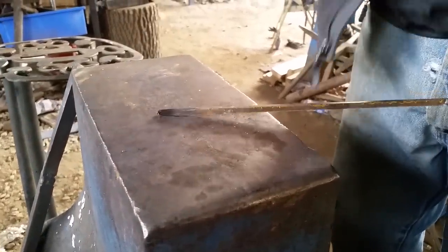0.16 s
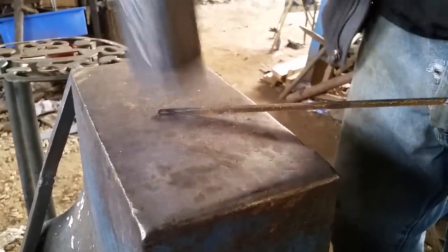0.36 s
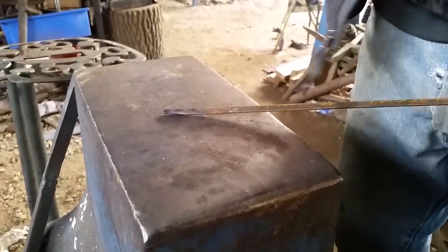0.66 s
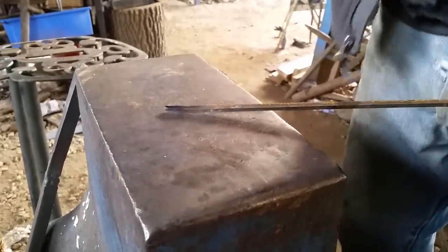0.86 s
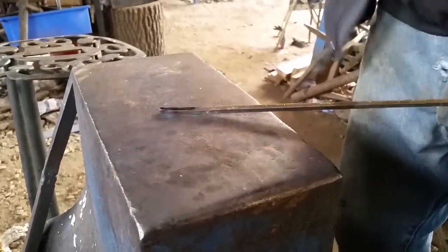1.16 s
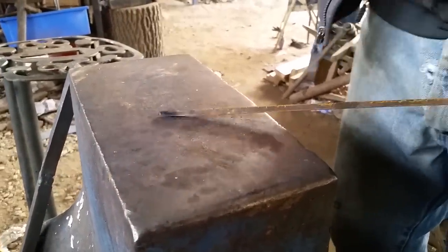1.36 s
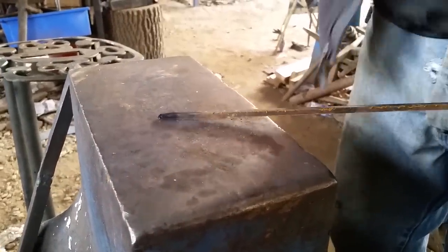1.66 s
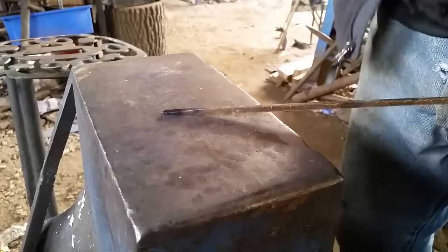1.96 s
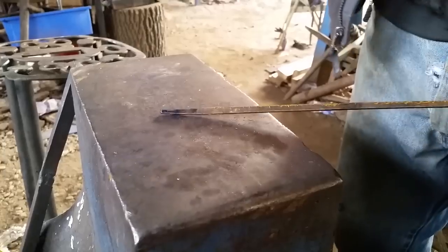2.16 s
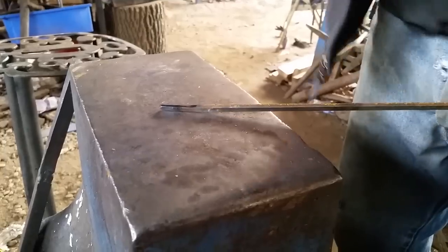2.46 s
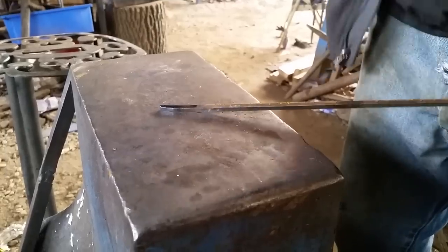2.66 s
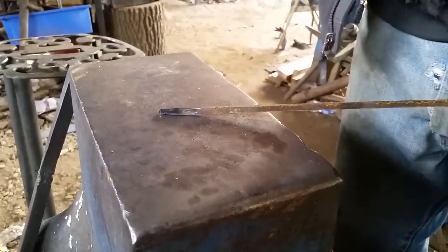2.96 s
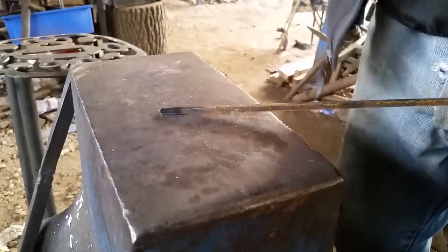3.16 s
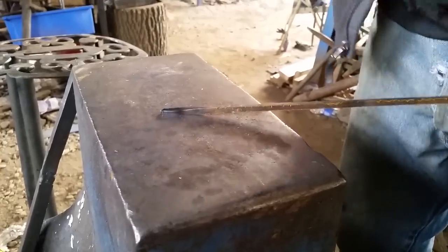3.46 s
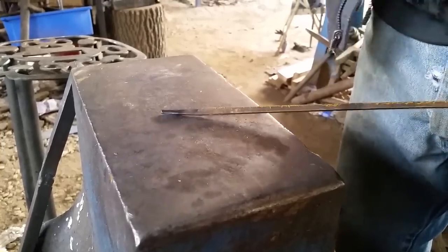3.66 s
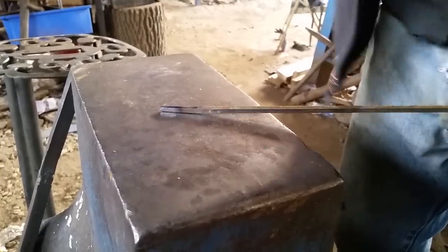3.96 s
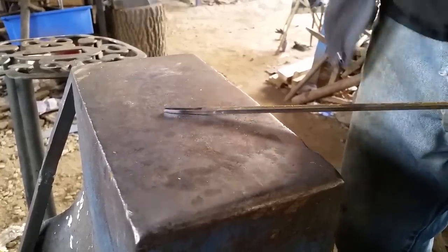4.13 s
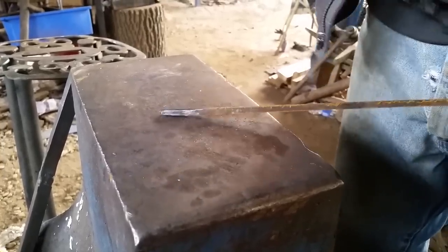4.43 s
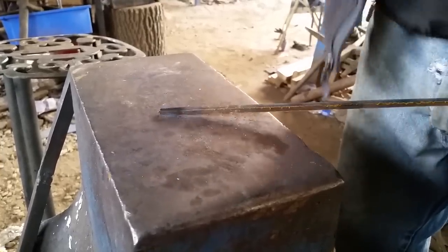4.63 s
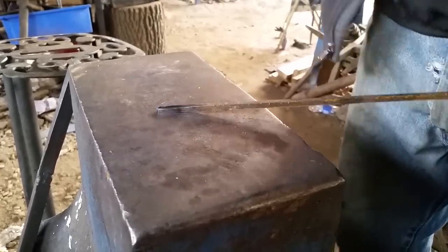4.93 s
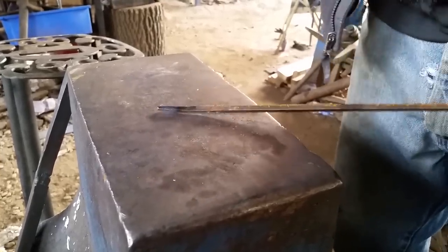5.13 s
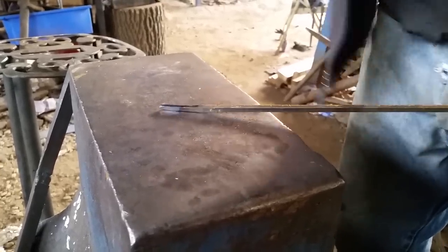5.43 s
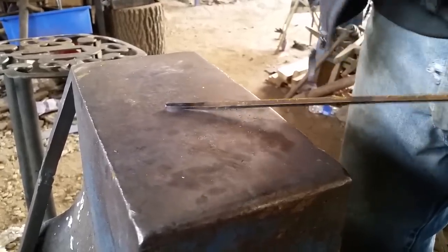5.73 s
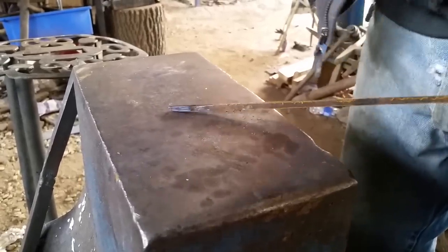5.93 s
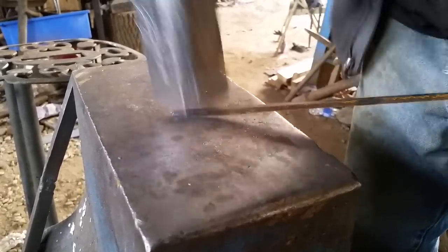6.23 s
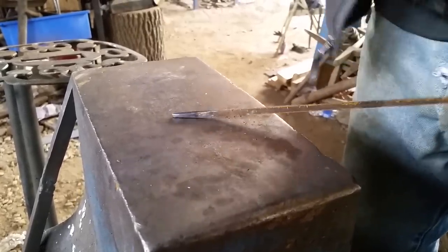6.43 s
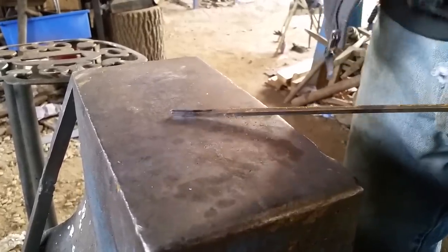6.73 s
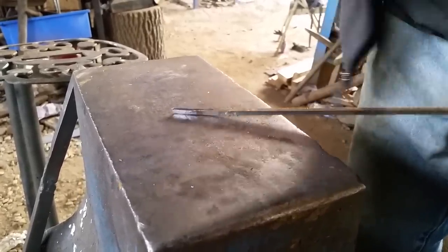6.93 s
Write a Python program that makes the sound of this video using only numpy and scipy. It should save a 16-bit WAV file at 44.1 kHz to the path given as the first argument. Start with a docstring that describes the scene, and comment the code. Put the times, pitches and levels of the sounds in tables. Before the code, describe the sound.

A hand hammer strikes a thin steel rod on an anvil, close to the microphone in an open shed. The work is already under way, and the first full blow lands at about 0.5 seconds. Others follow evenly at 1.2, 1.9, 2.7, 3.4, 4.2, 4.9, 5.6 and 6.4 seconds. Each is a sharp crack with a solid thump from the anvil's stand and a very high, fizzy ping that fades quickly. The blow at 1.9 seconds rings most, while those at 4.2 and 5.6 crack hardest. Between hits the rod makes barely audible scrapes and ticks on the anvil's face, with one clearer light tick at about 6.5 seconds. The shed answers each strike with a short reverberation and a soft, low boom. A faint outdoor rumble continues underneath throughout.

```python
"""Hammer and anvil in an open shed

A hand hammer flattens the tip of a thin steel rod with even blows, already under way, close by.
Each impact cracks, thumps the anvil's stand and excites the steel's modes, which ping and sizzle.
Between blows the rod slides and ticks on the face. The shed returns a few echoes, a short
reverberation and a low boom, over a faint outdoor rumble."""
import sys
import numpy as np
from scipy import signal
from scipy.fft import rfft, irfft, next_fast_len
from scipy.io import wavfile
from scipy.ndimage import map_coordinates

SR = 44100
rng = np.random.default_rng(int(sys.argv[2]) if len(sys.argv) > 2 else 0)


def digitize_waveform(pressure):
    """Quantize a signal to 16-bit integers and store it at the path in sys.argv[1].

    Rows of a 2-D input are taken as channels; values are limited to [-1, 1].
    """
    field = np.atleast_2d(pressure).T
    bounded = np.clip(field, -1, 1)
    quanta = np.round(bounded * 32767).astype(np.int16)
    wavfile.write(sys.argv[1], SR, quanta)


N = 312669
T = np.arange(SR) / SR  # one second from a sound's onset

# Levels within a table are relative; each source sets its own overall gain.
# background noise spectra: frequency_hz, density_db
RUMBLE_SPECTRUM = [(20, -14), (40, -6.5), (70, 0.5), (120, -2), (200, -5), (300, -23.5), (500, -30),
                   (1000, -67.5)]
RUSH_SPECTRUM = [(150, -2.5), (350, 6), (800, -5), (1500, -15.5), (2200, -28), (3200, -41), (8000, -55)]
HISS_SPECTRUM = [(1000, -2), (8000, -2.5), (11500, -0.5), (15000, -3)]
# likeness of left and right in a diffuse field: frequency_hz, correlation
COHERENCE = [(50, 0.93), (300, .82), (700, .45), (1500, 0.058), (6000, 0.048)]
# hammer blows: start_s, crack_db, ring_db, ping_decay_factor, sizzle_db
BLOWS = [(-0.31, -26.5, -44, .9, -30), (0.4495, -32.5, -42.5, 0.86, -34.5), (1.1956, -21, -41, 1, -33),
         (1.942, -26.5, -36.5, 0.89, -35), (2.6909, -19, -39, 0.93, -35.5), (3.431, -22.5, -39.5, 0.9, -33),
         (4.158, -17, -44, 0.56, -36), (4.9063, -23, -53, 0.82, -36.5), (5.63, -17.5, -42, 0.89, -40.5),
         (6.3525, -22, -48, 0.93, -39.5)]
# the anvil's main note: pitch_hz, level_db, base_t60_s
PING_MODES = [(6951, 0, .23), (6751, -23, .23), (6990, -17, .19)]
# other modes of the steel: pitch_hz, level_db, t60_s
SIDE_MODES = [(6197, 2.5, 0.23), (6160, -5, .19), (6095, -11, .15), (7570, -13, .16), (8075, -16, 0.11),
              (8620, -18, 0.1)]  # either side of the main note
LOW_MODES = [(3962, -3, .23), (4060, -7, .22), (4597, 3, .2), (5400, -12, .17), (5785, -6, .18)]
HIGH_MODES = [(10480, -5, .17), (11510, -3, .18), (11570, -1, .18), (11650, 0, .18), (12630, -5, .16),
              (12790, -4, .16), (13440, -5, .16), (13940, -7, .16)]
TOP_MODES = [(12950, -4, .17), (12988, 0, .18), (13020, -3, .18), (13080, -6, .16)]  # a close cluster that beats
# crowded steel modes in each channel: frequency_hz, density_db
SIZZLE_LEFT = [(2000, -40.5), (4000, -23), (5200, -28), (6700, -17.5), (8400, -41), (9800, -36),
               (10600, -18.5), (12200, -24), (13000, -10), (13500, -13.5), (14400, -11.5), (15000, -29.5)]
SIZZLE_RIGHT = [(2000, -44.5), (4000, -22), (5200, -36.5), (6700, -16), (8500, -35.5), (9400, -12.5),
                (10000, -12.5), (10500, -0.5), (11100, -4), (11600, 4), (12200, -5), (12950, -1),
                (14400, -9), (15000, -34)]
# the shed's reverberation time: frequency_hz, t60_s
SHED_DECAY = [(40, 0.52), (80, 0.6), (150, 0.5), (350, 0.6), (1000, 0.49), (2500, 0.41), (6000, 0.51)]
# spectra of the shed's reverberation: frequency_hz, density_db
LOW_TAIL = [(20, -12.5), (45, -8), (75, -5), (100, -8.5), (140, 8.5), (240, -6.5), (380, 0.5), (470, -3.5),
            (600, -29), (1200, -64.5)]
MID_TAIL = [(250, -28), (550, 0.5), (850, 2), (1150, 0), (2000, -10), (3000, -17), (4200, -32),
            (5200, -37.5), (8000, -56)]
BOOM_SPECTRUM = [(20, -24.5), (50, 5), (74, 8), (98, 0.5), (125, -7.5), (220, -8.5), (400, -25), (900, -66)]
# standing waves in the shed: pitch_hz, level_db, t60_s
SHED_MODES = [(73, -5, 2.0), (124, -2, .65), (148, -3, .42), (174, -2, .42), (200, 1, .4), (237, 2, .42),
              (271, 3, .38), (316, 2, .4), (358, 3, .42), (394, 1, .42), (617, -15, .45), (848, -16, .45),
              (1049, -17, .45)]
# the rod slides on the face: start_s, length_s, level_db
ROD_SLIDES = [(0, 0.15, -85), (1.42, 0.24, -86), (4.347, 0.42, -87)]
# modes of the anvil on its stand: pitch_hz, level_db, t60_s
STAND_MODES = [(58, -12.5, 0.05), (160.7, -3.5, .018), (230, -4, 0.026), (352, -2.5, 0.024)]
# the shed's early reflections: delay_s, relative_gain
ECHOES = [(0.014, .22), (0.0203, -0.23), (0.0224, 0.28), (.0264, -.5), (.033, 0.22)]
# the rod taps the face: start_s, level_db
ROD_TICKS = [(3.3972, -71), (3.6897, -66), (4.582, -67.5), (5.172, -67), (6.524, -47.5)]

RUMBLE_DB, HISS_DB = -57.5, -89.5
RUSH_FAINT_DB, RUSH_FULL_DB, RUSH_SWELL_S = -78.5, -66.5, 5.6
USUAL_CRACK_DB, USUAL_RING_DB, USUAL_SIZZLE_DB = -22.5, -43, -36  # an ordinary blow
THUMP_DB, CLANK_DB, SIDE_DB, LOW_DB = -11.5, -37, -53.5, -60.5  # gains in an ordinary blow
# a blow that lands square cracks harder, and these grow with it, in dB per dB of crack
THUMP_GROWS, CLANK_GROWS, LOW_GROWS, TOP_GROWS = 0.053, 0.14, 0.49, 0.93
SIDE_FOLLOWS, LOW_FOLLOWS = 0.56, 0.7  # dB per dB of ring
CLANK_BRIGHTENS = 0.55  # dB of treble per dB of sizzle
BAND_LIMIT_HZ = 15865


def amp(db):
    """Amplitude ratio of a level in decibels."""
    return 10 ** (np.asarray(db) / 20)


def unit(x):
    """Normalisation to rms 1."""
    return x / np.sqrt(np.mean(x ** 2) + 1e-20)


def along(points, hz):
    """Interpolation on a logarithmic frequency axis."""
    knots_hz, values = np.transpose(points)
    return np.interp(np.log(hz + 1), np.log(knots_hz + 1), values)


def fade(t60, t=T):
    """Exponential decay, 60 dB in t60 seconds."""
    return np.exp(-np.log(1000) * t / t60)


def rise(time_constant_s):
    """First-order growth towards 1."""
    return 1 - np.exp(-T / time_constant_s)


def filtered(x, response):
    """Linear filtering: the spectrum times a frequency response."""
    n = x.shape[-1]
    m = next_fast_len(n + SR // 4)
    return irfft(rfft(x, m) * response(np.fft.rfftfreq(m, 1 / SR)), m)[..., :n]


def shaped(x, points):
    """Equalisation through points of frequency_hz, gain_db."""
    return filtered(x, lambda hz: amp(along(points, hz)))


def noise(spectrum, size=SR):
    """Diffuse-field noise of rms 1: the channels cohere at long wavelengths."""
    def response(hz):
        angle = np.arccos(np.clip(along(COHERENCE, hz), -1, 1)) / 2
        return amp(along(spectrum, hz)) * [np.cos(angle), np.sin(angle)]
    mid, side = filtered(rng.standard_normal((2, size)), response)
    return unit(np.array([mid + side, mid - side]))


def wobble(rate_hz):
    """Smooth random modulation, one second long."""
    coarse = map_coordinates(rng.standard_normal(256), [T[::64] * rate_hz], mode="wrap")
    return np.interp(T, T[::64], coarse)


def pan(right_db):
    """Channel gains for a level difference, right over left."""
    return amp([[-right_db / 2], [right_db / 2]])


def add(track, start_s, sound):
    """Superposition of a sound on the track."""
    start = round(start_s * SR)
    first, last = max(start, 0), min(start + sound.shape[-1], N)
    track[:, first:last] += sound[..., first - start:last - start]


def outdoors():
    """Ambient noise: steady rumble and microphone hiss; a distant rush swells once, then holds."""
    swell = np.sin(np.pi / 2 * np.minimum(np.arange(N) / SR / RUSH_SWELL_S, 1)) ** 2
    rush = amp(RUSH_FAINT_DB + (RUSH_FULL_DB - RUSH_FAINT_DB) * swell) * noise(RUSH_SPECTRUM, N)
    return amp(RUMBLE_DB) * noise(RUMBLE_SPECTRUM, N) + rush + amp(HISS_DB) * noise(HISS_SPECTRUM, N)


def ring(modes, direct, waver_hz, steady, decay_factor=1):
    """Interference: damped modes arrive directly, then swell and beat as reflections add."""
    out = np.zeros((2, SR))
    drift = lambda: wobble(waver_hz) + 1j * wobble(waver_hz)
    for hz, db, t60 in modes:
        age = np.log(1000) * T / (t60 * decay_factor)
        diffuse = steady + 0.31 * drift() + 0.6 * np.array([drift(), drift()])
        envelope = (direct + age ** 1.33 * diffuse) * np.exp(-age) * rise(0.00075)
        phase = rng.random() + rng.normal(0, 0.09, (2, 1))
        spot_db = rng.normal(0, 2.5)  # the spot struck favours some modes
        out += amp(db + spot_db) * unit(np.real(envelope * np.exp(2j * np.pi * (hz * T + phase))))
    return unit(out) / np.sqrt(20)  # the energy of 50 ms at rms 1


def sizzle():
    """Modal overlap: steel modes too crowded to resolve merge into noise, stronger on the right."""
    def colour(hz):
        # each spot of contact favours other clumps of modes, about 130 Hz apart
        clumps_db = np.interp(hz, np.arange(200) * 130, rng.normal(0, 4, 200))
        return amp(clumps_db + np.array([along(SIZZLE_LEFT, hz), along(SIZZLE_RIGHT, hz)]))
    return unit(filtered(rng.standard_normal((2, SR)), colour))


def steel():
    """Free vibration: hammer and anvil ring in their natural modes after each blow."""
    out = np.zeros((2, N))
    # a bright flash at contact, then its reverberation
    flash = amp(12) * (fade(0.026) * (1 - np.exp(-(T / 0.0012) ** 2)) + fade(0.23) * rise(0.089))
    for start_s, crack_db, ring_db, decay_factor, sizzle_db in BLOWS:
        square_db, lively_db = crack_db - USUAL_CRACK_DB, ring_db - USUAL_RING_DB
        side_db = SIDE_DB + SIDE_FOLLOWS * lively_db
        low_db = LOW_DB + LOW_FOLLOWS * lively_db + LOW_GROWS * square_db
        top_db = sizzle_db - 14 + TOP_GROWS * square_db
        ping = ring(PING_MODES, direct=0.13, waver_hz=53, steady=0.93, decay_factor=decay_factor)
        modes = amp(ring_db) * pan(0.67) * ping
        modes += amp(side_db) * pan(-1) * ring(SIDE_MODES, direct=2.6, waver_hz=123, steady=0.27)
        modes += amp(low_db) * pan(-1) * ring(LOW_MODES, direct=0.9, waver_hz=120, steady=0.3)
        modes += amp(sizzle_db - 15) * pan(9.8) * ring(HIGH_MODES, direct=1.7, waver_hz=191, steady=0.2)
        modes += amp(top_db) * pan(21) * ring(TOP_MODES, direct=1.9, waver_hz=130, steady=0.21)
        add(out, start_s + 0.00048, modes + amp(sizzle_db) * flash * sizzle())
    return out


def shed_tail(spectrum, build_s):
    """Reverberation: a diffuse field builds up, then decays at each frequency's own rate."""
    hz, t, bins = signal.stft(noise(spectrum), SR, nperseg=512)
    _, tail = signal.istft(bins * fade(along(SHED_DECAY, hz)[:, None], t), SR, nperseg=512)
    return tail[:, :SR] * rise(build_s)


def shed_resonance():
    """Room response to a thump: standing waves, a diffuse tail and a long boom."""
    phases = lambda: rng.random() + rng.normal(0, 0.046, (2, 1))
    waves = sum(amp(db) * fade(t60) * np.sin(2 * np.pi * (hz * T + phases()))
                for hz, db, t60 in SHED_MODES)
    boom = amp(-22.5) * noise(BOOM_SPECTRUM) * fade(2.65) * rise(0.018)
    tail = amp(-8.5) * shed_tail(LOW_TAIL, build_s=0.027)
    return (amp(-14.5) * waves * rise(0.0064) + tail + boom) * (1 - T ** 4)


def rod_contact():
    """Light contact excites mainly the highest steel modes."""
    return shaped(sizzle(), [(8000, -18), (10000, -5), (11800, 3.5), (13000, -4)])


def rod_slides():
    """Sliding friction: the rod scrapes unevenly as it is turned on the face."""
    out = np.zeros((2, N))
    for start_s, length_s, db in ROD_SLIDES:
        stroke = np.sin(np.pi * np.clip(T / length_s, 0, 1)) * amp(3.34 * wobble(40))
        add(out, start_s, amp(db) * stroke * rod_contact())
    return out


def air_puff():
    """Displacement: air squeezed from under the hammer buffets each microphone port separately."""
    gust = shaped(rng.standard_normal((2, SR)), [(30, -3), (120, 1.5), (300, -0.5), (700, -17), (2000, -49)])
    return pan(5.8) * unit(gust * fade(0.017) * rise(0.0022) ** 2)


def crack():
    """Acceleration noise: the hammer stops dead, giving one pressure swing and a gritty burst."""
    age = T / 0.00014
    snap = -(age / 2) ** 2 * np.exp(2 - age) * np.sin(2 * np.pi * 920 * T)
    grit = noise(MID_TAIL) * fade(0.019) * rise(0.00047)
    return amp(1) * snap + amp(-6.5) * grit


def clank(shared_tail, sizzle_db):
    """Midrange reverberation, partly common to all blows, brighter when the steel sizzles more."""
    treble_db = CLANK_BRIGHTENS * (sizzle_db - USUAL_SIZZLE_DB)
    tail = 0.7 * shared_tail + 0.52 * shed_tail(MID_TAIL, build_s=0.049)
    return shaped(tail, [(1200, 0.001), (2800, treble_db)])


def stand_thump():
    """Heavily damped oscillation of the anvil on its stand."""
    modes = sum(amp(db) * fade(t60) * np.sin(2 * np.pi * hz * T) for hz, db, t60 in STAND_MODES)
    return modes * rise(0.00096)


def impacts():
    """Impulsive excitation: each blow puffs, cracks and thumps, and the shed reflects the sound."""
    out = np.zeros((2, N))
    thump, resonance = stand_thump(), shed_resonance()
    shared_tail = shed_tail(MID_TAIL, build_s=0.031)
    for start_s, crack_db, _, _, sizzle_db in BLOWS:
        square_db = crack_db - USUAL_CRACK_DB
        thump_db, clank_db = THUMP_DB + THUMP_GROWS * square_db, CLANK_DB + CLANK_GROWS * square_db
        add(out, start_s + 0.0011, amp(crack_db) * crack())
        add(out, start_s + 0.0025, amp(clank_db) * clank(shared_tail, sizzle_db))
        add(out, start_s, amp(thump_db - 34) * air_puff())
        add(out, start_s + 0.0035, amp(thump_db) * (thump + amp(-12) * resonance))
        for delay_s, gain in ECHOES:
            add(out, start_s + 0.0035 + delay_s, amp(thump_db - 4.5) * gain * thump)
    return out


def rod_ticks():
    """Light impacts: the rod settles on the face with bright ticks and a faint ring."""
    out = np.zeros((2, N))
    envelope = fade(0.0076) + amp(-35) * fade(0.2)
    for start_s, db in ROD_TICKS:
        add(out, start_s, amp(db + 3) * pan(5) * rod_contact() * envelope)
    return out


def scene():
    """Superposition of the forge's sources and the outdoor background."""
    return impacts() + steel() + rod_ticks() + rod_slides() + outdoors()


def record(dry):
    """Finite bandwidth: the microphone thins the deepest bass and the top, up to its band limit."""
    bass_cut = lambda hz: 1j * hz / (28 + 1j * hz)
    coloured = filtered(dry, lambda hz: bass_cut(hz) * amp(np.interp(hz, [14550, 14950], [0, -11])))
    return filtered(coloured, lambda hz: np.clip((BAND_LIMIT_HZ - hz) / 200, 0, 1))


dry = scene()
out = record(dry)
digitize_waveform(out)
```